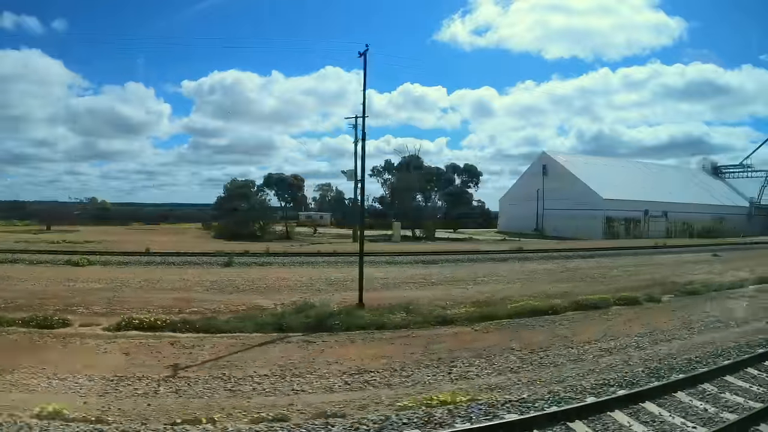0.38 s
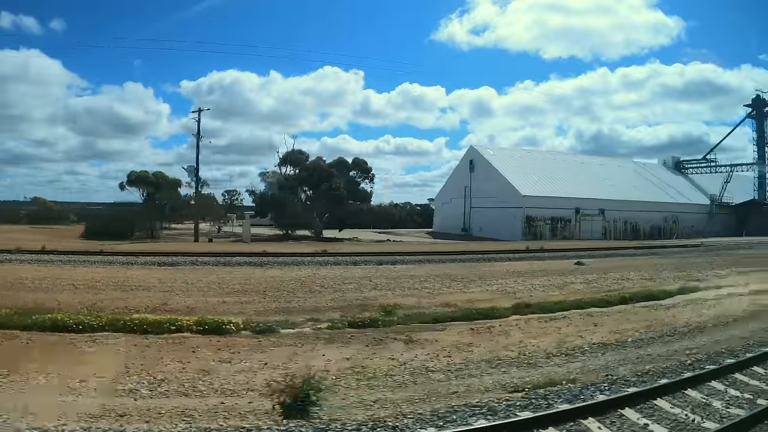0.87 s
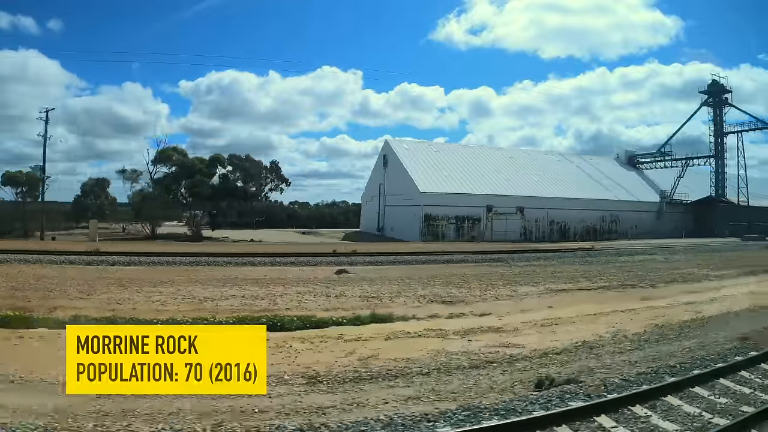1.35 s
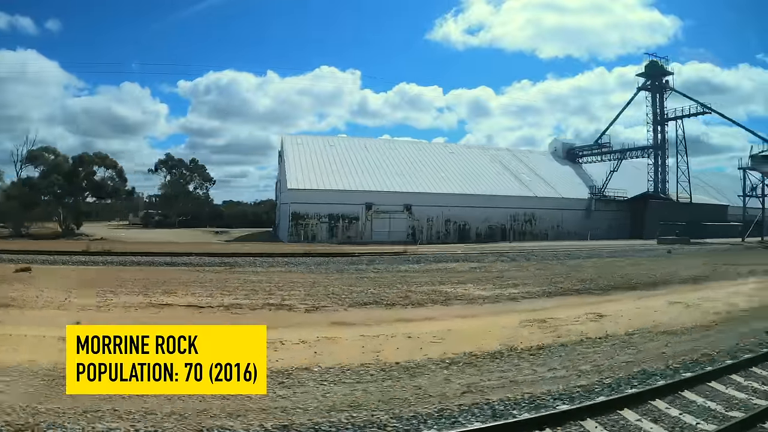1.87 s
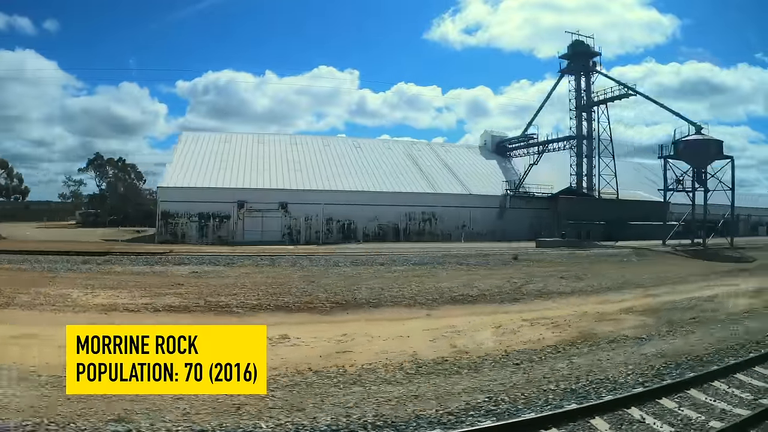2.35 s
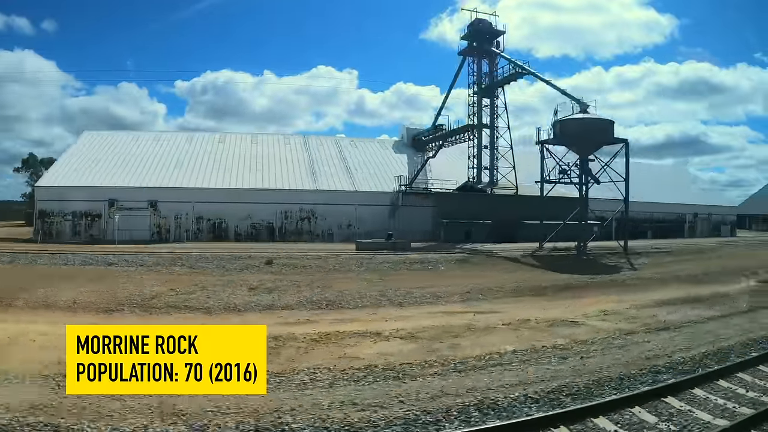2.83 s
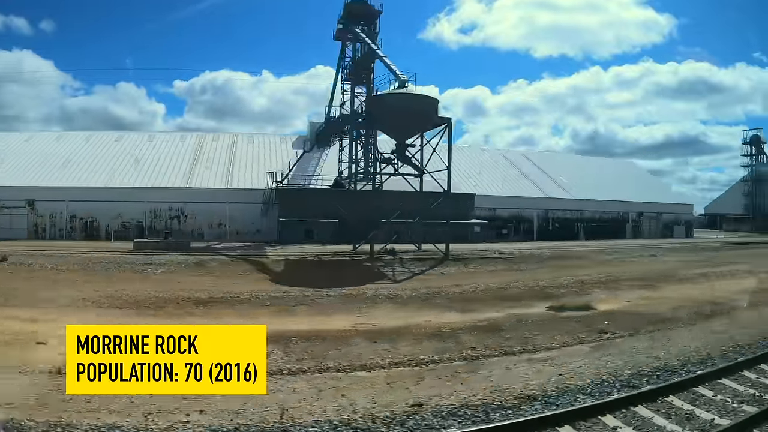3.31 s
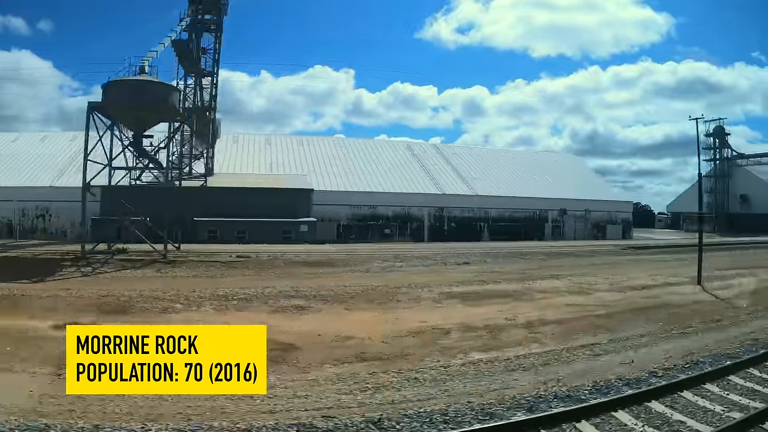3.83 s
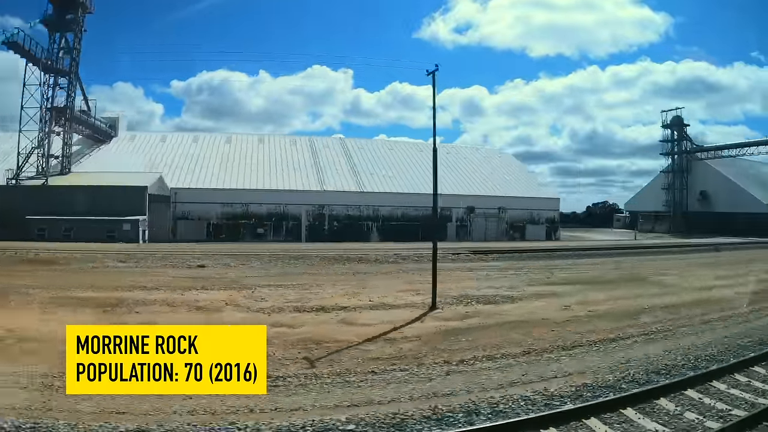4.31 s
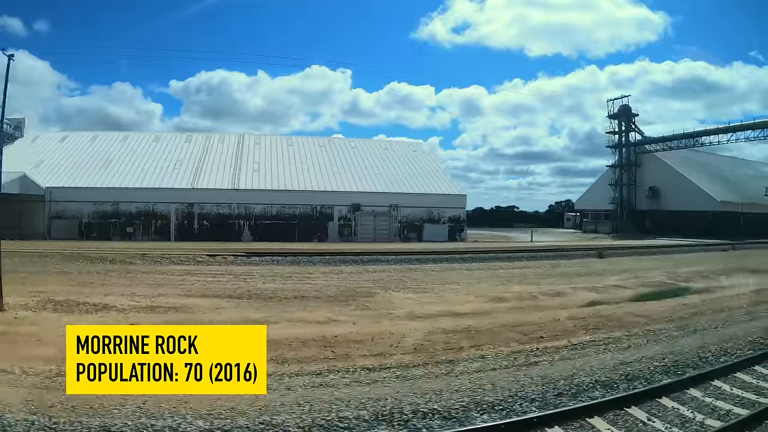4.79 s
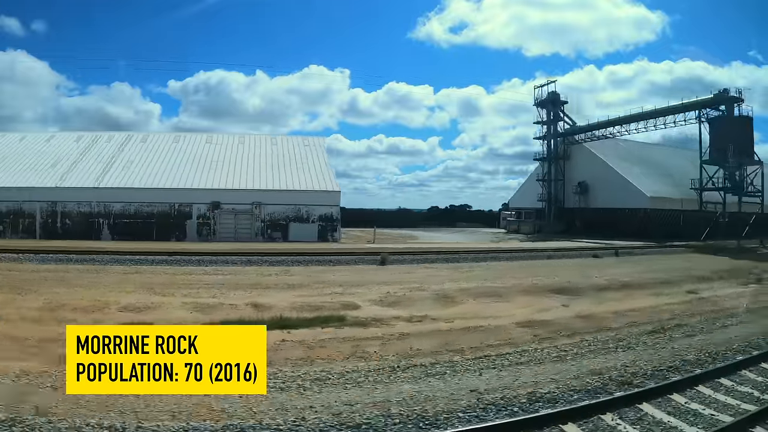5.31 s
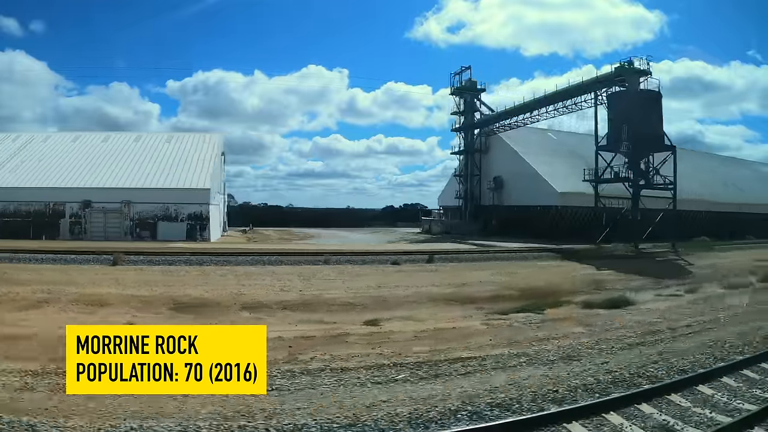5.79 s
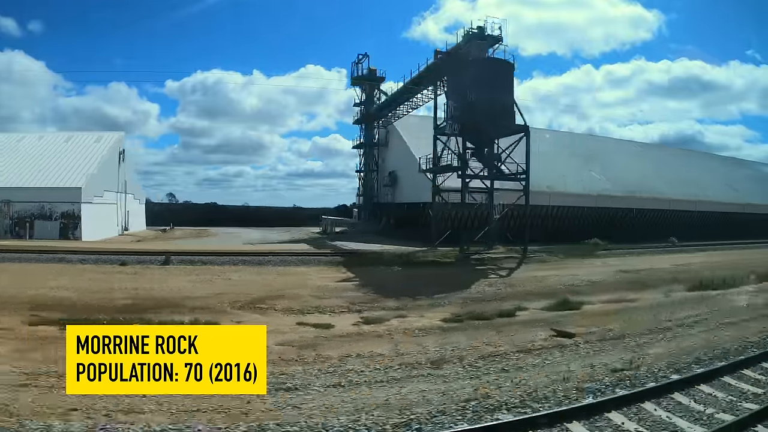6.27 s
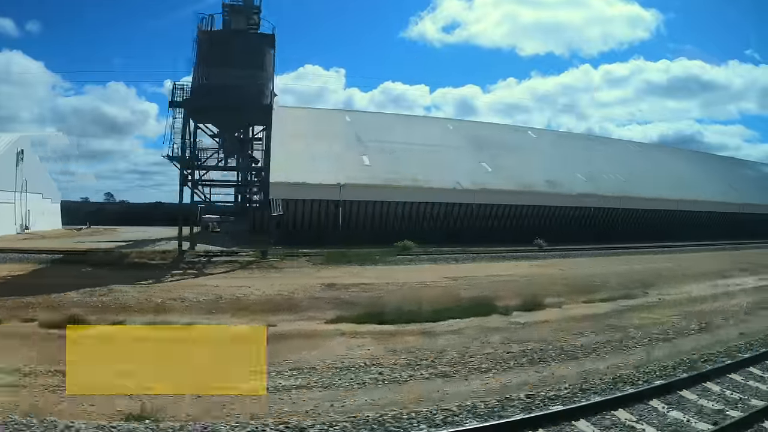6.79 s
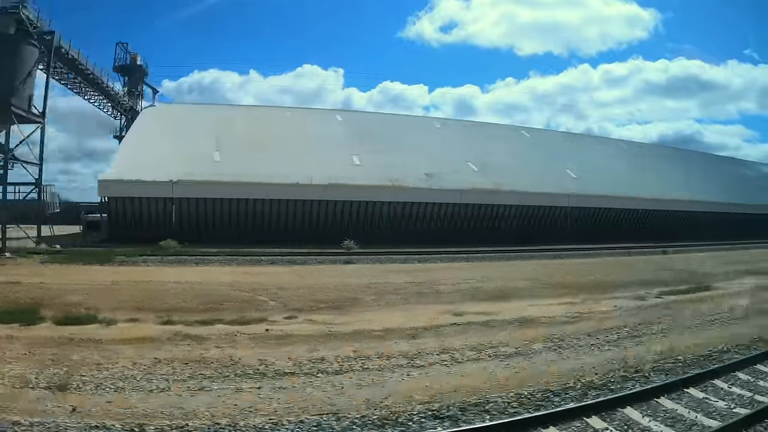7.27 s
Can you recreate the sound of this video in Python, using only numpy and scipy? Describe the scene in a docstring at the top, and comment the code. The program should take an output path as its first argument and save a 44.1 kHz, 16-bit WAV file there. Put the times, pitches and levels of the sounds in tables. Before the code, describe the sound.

Interior of a diesel passenger carriage running at speed past open land and large sheds, which make no sound of their own. From 0 to about 7.4 s a dense, dark roar of wheels on rail holds nearly steady, strongest below 400 Hz, with little treble. Soft floor booms near 76 Hz swell irregularly, strongest around 1.5, 4.3 and 6.4 s. Wheel tones form a wavering hum that climbs very slightly, a bit faster after 5.4 s; thin machinery whines around 650 to 860 Hz beat slowly. A light knock at 0.29 s and a sharper clustered one at 0.52 s ring briefly on a hard panel. A tiny squeak glides up at 0.9 s. Wall drones near 220 Hz surge around 2.2 and 2.8 s, others later. Faint treble rustles flicker throughout. A soft click comes at 3.6 s, a small rattle at 5.04 s, and faint clicks close it at 7.3 s.

```python
"""A low rolling roar with a comb of slowly climbing tones, inside a diesel passenger carriage at speed.
Wheel noise and floor booms are filtered noise and a wandering sine; the comb is multiples of the wheel's turning
rate, which rises as the train gains speed. Machinery whines are wavering sines, some beating slowly. Treble noise
rustles in flurries; short noise bursts click and rattle, a panel rings in decaying modes when knocked,
the walls drone in surges and one small squeak glides upward."""
import sys
import numpy as np
from scipy import signal
from scipy.fft import rfft, irfft
from scipy.io import wavfile
from scipy.ndimage import uniform_filter1d

SR = 44100
rng = np.random.default_rng(int(sys.argv[2]) if len(sys.argv) > 2 else 0)


def waveform_to_disk(signal):
    """Save audio, clipped to [-1, 1], as 16-bit WAV at the path in sys.argv[1]."""
    frames = np.transpose(np.atleast_2d(signal))
    scaled = np.clip(frames, -1, 1) * 32767
    samples = np.round(scaled).astype(np.int16)
    wavfile.write(sys.argv[1], SR, samples)


def voltage_ratio(decibels):
    """Convert decibels (scalar or array-like) to amplitude ratios, 20 dB per decade."""
    exponent = np.asarray(decibels, float) / 20
    return 10 ** exponent


N = 325634


def evened(x):
    """Scales to rms 1."""
    return x / np.sqrt(np.mean(x ** 2) + 1e-20)


def along(rows):
    """Columns of a table over time, one value a sample."""
    s, *columns = np.transpose(rows)
    return [np.interp(np.arange(N) / SR, s, c) for c in columns]


def drift(rate, count):
    """Slow chance: straight paths between normal random values, rate of them a second."""
    knots = rng.standard_normal((count, 300))
    at = np.arange(N) / SR * rate
    return [np.interp(at, np.arange(knots.shape[1]), row) for row in knots]


def shape(points, size):
    """Bin frequencies and a spectrum read on a log-frequency axis."""
    hz = np.fft.rfftfreq(size, 1 / SR)
    f, db = np.transpose(points)
    return hz, np.interp(np.log(hz + 1), np.log(f + 1), db)


def noise(shape_db, size, patchy_db, patch_s, patch_hz):
    """Random short-time spectra under a shape, with louder and quieter patches; rms 1."""
    hop = size // 4
    a, b, patches = rng.standard_normal((N // hop + 5, size // 2 + 1, 3)).T
    patches = uniform_filter1d(patches, max(1, round(patch_hz * size / SR)), 0)
    patches = evened(uniform_filter1d(patches, max(1, round(patch_s * SR / hop)), 1))
    z = (a + 1j * b) * voltage_ratio(shape_db[:, None] + patchy_db * patches)
    return evened(signal.istft(z, nperseg=size, noverlap=size - hop)[1][:N])


def swell(s, top_db, rise, fall):
    """Power of a bump that climbs 10 dB in rise seconds and sinks 10 dB in fall seconds."""
    t = np.arange(N) / SR - s
    return voltage_ratio(2 * top_db + 20 * np.minimum(t / rise, -t / fall))


def burst(s, level_db, centre_hz, width, rise, t60, wide_db=-14):
    """A decaying burst of noise: a broad ring over a weaker wide-band snap."""
    out = np.zeros(N + SR)
    t = np.arange(SR // 2) / SR
    hz = np.fft.rfftfreq(len(t), 1 / SR)
    snap = voltage_ratio(wide_db) / (1 + (hz / 6000) ** 4) / (1 + (500 / (hz + 1)) ** 4)
    ring = 1 / (1 + (2 * (hz - centre_hz) / width) ** 4)
    hiss = evened(irfft(rfft(rng.standard_normal(len(t))) * (ring + snap), len(t)))
    envelope = (1 - np.exp(-t / rise)) * voltage_ratio(level_db - 60 * t / t60)
    out[round(s * SR):][:len(t)] = hiss * envelope
    return out[:N]


def shell_db(hz):
    """Gain of the body shell: its resonances lift the roar and the wheel tones."""
    # resonances: f/Hz, width/Hz, gain/dB
    resonances = [(120.4, 18, 5.5), (200, 5.4, 4.5), (223, 5.2, 2), (230.6, 10, 3.5), (353.2, 14, 6),
                  (426, 14, 2.5), (451, 24, 1.5), (613, 68, 2)]
    return sum(gain_db / (1 + (2 * (hz - f) / width) ** 2) for f, width, gain_db in resonances)


def roar():
    """Wheels on rail roughness, heard through floor and walls and coloured by the body shell."""
    # spectrum ahead of the shell resonances: f/Hz, relative density/dB per Hz
    roar_spectrum = [(20, -29.5), (33, -23), (48, -7.5), (80, -7), (105, -5.5), (220, -5.5), (290, -11),
                     (400, -13), (480, -15.5), (700, -24), (870, -25), (930, -29.5), (1100, -33.5),
                     (1500, -39.5), (2500, -48), (5000, -69), (12000, -110)]
    # swell of the whole roar: t/s, level/dB rms
    roar_level = [(0, -31.5), (1.3, -33.5), (3.8, -33), (4.3, -32.5), (5.3, -33.5), (6.3, -32.5),
                  (7.38, -33)]
    hz, db = shape(roar_spectrum, size=8192)
    rolling = noise(db + shell_db(hz), size=8192, patchy_db=1.5, patch_s=.25, patch_hz=30)
    return voltage_ratio(along(roar_level)[0]) * rolling


def boom(centre_hz=76.3, wander_hz=9.1, calm_db=-44.5):
    """The lowest resonance of the floor, booming at jolts from uneven track, on a wandering pitch."""
    # jolts: t/s at the top, level/dB rms at the top
    jolts = [(.07, -32), (.61, -33), (1.51, -28), (2.4, -32), (2.79, -42), (3.29, -31), (3.81, -33.5),
             (4.11, -33), (4.34, -30.5), (4.62, -37), (5.04, -35.5), (5.66, -35.5), (6.44, -30.5),
             (6.82, -44), (7.02, -36.5)]
    hz = centre_hz + wander_hz * drift(22., count=1)[0]
    power = voltage_ratio(2 * calm_db) + sum(swell(s, db, rise=.12, fall=.099) for s, db in jolts)
    return np.sqrt(2 * power) * np.sin(2 * np.pi * np.cumsum(hz) / SR)


def wheels(waver_db=2.2, waver_rad=1.1, rate=2.2):
    """Bumps come round every turn; several wheels share them, so tones waver, and swell at resonances."""
    # wheel speed as the train gains pace: t/s, turning rate/turns per second
    wheel_speed = [(0, 11.46), (1.48, 11.497), (2.95, 11.536), (4.43, 11.568), (5.4, 11.605), (5.9, 11.65),
                   (6.5, 11.745), (7.38, 11.79)]
    # unevenness round the wheel: multiple of the turning rate, level/dB rms ahead of waver and shell
    orders = [(2, -59.5), (3, -59.5), (4, -57), (5, -43.5), (6, -55), (7, -49.5), (8, -43), (10, -51),
              (11, -58.5), (12, -48), (13, -62.5), (14, -44.5), (15, -46.5), (16, -58.5), (17, -47),
              (18, -47.5), (19, -49), (20, -47), (22, -58), (23, -48.5), (24, -63), (25, -56), (26, -52),
              (27, -54), (28, -52.5), (29, -57), (30, -55), (31, -55), (32, -56.5), (33, -64.5),
              (34, -62.5), (35, -54), (36, -64.5), (37, -58), (38, -56.5), (42, -54.5), (43, -67),
              (44, -67.5), (45, -73.5), (47, -64), (48, -63), (50, -69.5), (52, -73.5), (53, -77),
              (54, -73), (55, -70.5), (57, -67), (58, -73)]
    speed = along(wheel_speed)[0]
    turns = 2 * np.pi * np.cumsum(speed) / SR
    level, slip = drift(rate, count=len(orders)), drift(rate, count=len(orders))
    start = 2 * np.pi * rng.random(len(orders))
    out = np.zeros(N)
    for (k, db), u, v, p in zip(orders, level, slip, start):
        # the shell gain is read every 100 samples
        gain_db = np.repeat(shell_db(k * speed[::100]), 100)[:N]
        loudness = np.sqrt(2) * voltage_ratio(db + waver_db * u + gain_db)
        out += loudness * np.cos(k * turns + waver_rad * v + p)
    return out


def whines(rate=3., waver_db=1.2, waver_rad=.25):
    """Tones of engine, gears and fans at fixed speed, each wavering a little."""
    # machinery: f/Hz, level/dB rms ahead of the waver
    machinery = [(45.1, -50), (652.7, -66), (743.6, -65), (819.4, -63.5), (832.4, -67), (841.8, -67),
                 (847.9, -67), (934.7, -74), (1200.3, -78), (1309.7, -71), (1402.3, -84)]
    t = np.arange(N) / SR
    level, slip = drift(rate, count=len(machinery)), drift(rate, count=len(machinery))
    start = 2 * np.pi * rng.random(len(machinery))
    out = np.zeros(N)
    for (hz, db), u, v, p in zip(machinery, level, slip, start):
        loudness = np.sqrt(2) * voltage_ratio(db + waver_db * u)
        out += loudness * np.cos(2 * np.pi * hz * t + waver_rad * v + p)
    return out


def twins(rate=4., waver_db=.7, waver_rad=.2):
    """Two engines a little out of step share each tone: loud when in step, sinking when opposed."""
    # shared tones: f/Hz, level/dB rms ahead of beating and waver, second engine's share/0-1, one dip/s
    shared_tones = [(738.6, -59.5, .45, 4.55), (756.4, -58.3, .45, 5.3), (773.3, -65, .7, 5.55),
                    (859.7, -55.5, .22, 4.95)]
    # how fast the engines slip past each other: t/s, rate/beats per second
    beat_rate = [(0, .44), (7.38, .57)]
    t = np.arange(N) / SR
    beats = 2 * np.pi * np.cumsum(along(beat_rate)[0]) / SR
    level, slip = drift(rate, count=len(shared_tones)), drift(rate, count=len(shared_tones))
    start = 2 * np.pi * rng.random(len(shared_tones))
    out = np.zeros(N)
    for (hz, db, share, dip), u, v, p in zip(shared_tones, level, slip, start):
        beating = abs(1 - share * np.exp(1j * (beats - beats[round(dip * SR)])))
        loudness = np.sqrt(2) * voltage_ratio(db + waver_db * u) * beating
        out += loudness * np.cos(2 * np.pi * hz * t + waver_rad * v + p)
    return out


def rustle(dull_db=-69, dull_share=0.47, corner_hz=3500, flicker_db=1.5, flickers_per_s=27):
    """Patchy treble noise that comes and goes; its lower part follows the unrest only in part."""
    # spectrum: f/Hz, relative density/dB per Hz
    rustle_spectrum = [(700, -26), (1500, -8), (2500, -7), (3700, -7.5), (5000, -11), (7000, -13.5),
                       (8600, -21), (9800, -18.5), (11200, -36.5), (14000, -74.5)]
    # floor under the flurries: t/s, level/dB rms
    calm_level = [(0, -70.5), (.25, -79.5), (.7, -74.5), (.85, -88.5), (2.1, -91), (2.4, -82.5), (3.6, -78),
                  (4.05, -81), (4.2, -85), (4.7, -83.5), (5.15, -81), (5.6, -89), (6.1, -82), (6.6, -86),
                  (7.0, -83), (7.38, -74)]
    # flurries: t/s at the top, level/dB rms at the top, rise/s per 10 dB, fall/s per 10 dB
    flurries = [(.075, -71.5, .02, 0.069), (0.921, -76, .12, 0.082), (1.1, -74.5, 0.014, 0.13),
                (1.3, -78, 0.067, .07), (1.52, -73.5, 0.046, 0.067), (1.7, -74, 0.055, .07),
                (1.76, -75.5, .012, 0.069), (1.989, -77.5, .008, 0.082), (2.429, -76, 0.25, 0.22),
                (2.72, -75, .05, .15), (3.07, -72.5, .15, 0.086), (3.301, -75, 0.046, 0.062),
                (3.46, -75.5, .08, .03), (3.805, -75, .012, .06), (3.88, -74.5, .02, 0.048),
                (4.04, -77, 0.033, .07), (4.54, -81, 0.046, .12), (4.656, -77.5, 0.035, 0.17),
                (4.85, -73.5, .06, .05), (5.72, -71.5, .08, .17), (6.181, -73.5, 0.037, 0.044),
                (6.3, -77, .03, 0.045), (7.11, -77, .01, 0.044)]
    power = voltage_ratio(2 * along(calm_level)[0]) + sum(swell(*row) for row in flurries)
    unrest_db = 10 * np.log10(power) + flicker_db * drift(flickers_per_s, count=1)[0]
    hz, db = shape(rustle_spectrum, size=512)
    # share of the power that goes to the bright part
    high = 1 / (1 + (corner_hz / (hz + 1)) ** 4)
    bright_shape = db + 10 * np.log10(high)
    dull_shape = db + 10 * np.log10(1 - high + 1e-9)
    bright = noise(bright_shape, size=512, patchy_db=2.2, patch_s=.025, patch_hz=2000)
    dull = noise(dull_shape, size=512, patchy_db=2.0, patch_s=.04, patch_hz=800)
    dull_level = dull_db + dull_share * (unrest_db - unrest_db.mean())
    return voltage_ratio(unrest_db) * bright + voltage_ratio(dull_level) * dull


def clicks():
    """Short noise bursts: clicks of fittings, the bright snap of the knocks, and one at the very end."""
    # bursts: t/s, level/dB ahead of rise and decay, centre f/Hz, width/Hz, rise time constant/s
    bursts = [(0.285, -53.5, 2500, 8000, .002), (.368, -61, 5330, 7000, .0012),
              (.464, -60, 2980, 3000, .003), (0.518, -47.5, 2810, 4500, .001),
              (0.5185, -66, 9000, 5000, .0006), (0.538, -57.5, 2950, 3000, 0.0022),
              (1.9964, -67, 3800, 2000, 0.0017), (3.2914, -66, 3540, 3000, .0023),
              (3.6, -51, 3000, 5000, 0.011), (6.285, -62, 3500, 2030, .0043),
              (7.33, -56.5, 3600, 3000, 0.0051), (7.365, -59.5, 4060, 3900, .003)]
    return sum(burst(*row, t60=.16) for row in bursts)


def knocks(rise_s=.0004):
    """Each knock on a hard panel starts all its modes, which ring as decaying sines."""
    # blows: t/s, strength/dB
    blows = [(.285, -58), (.289, -56), (.5173, -43), (.5212, -47), (.5275, -49), (.5385, -55)]
    # modes of the panel: f/Hz, level/dB on top of the blow, t60/s
    modes = [(420, 7, .04), (640, 9, .035), (790, 13, .045), (1130, 7, .04), (1370, -1, .04),
             (1600, 4, .04), (2010, 0, .035), (2340, 3, .045), (2760, 5, .04), (3090, 1, .04),
             (3600, 5, .03), (3950, 0, .035), (4500, -3, .03)]
    out = np.zeros(N)
    t = np.arange(SR // 5) / SR
    contact = 1 - np.exp(-(t / rise_s) ** 2)
    chances = rng.standard_normal((len(blows), len(modes)))
    for (s, blow_db), chance in zip(blows, chances):
        for (hz, db, t60), u in zip(modes, chance):
            # chance shifts each mode a little in level and pitch at each blow
            decay = voltage_ratio(blow_db + db + 1.5 * u - 60 * t / t60)
            ring = decay * np.sin(2 * np.pi * hz * (1 + .012 * u) * t)
            out[round(s * SR):][:len(t)] += contact * ring
    return out


def surges(wander_hz=7.93):
    """The drone of the walls swells now and then, as sines on an unsteady pitch."""
    # surges: t/s at the top, level/dB rms at the top, f/Hz
    drones = [(.4, -41, 215), (.62, -34.5, 110), (1.75, -38, 225), (2.22, -34.5, 224), (2.78, -35.5, 222),
              (3.4, -38.5, 222), (4.1, -36, 135), (4.17, -36.5, 232), (5.75, -38.5, 205), (6.3, -39, 225),
              (6.95, -35.5, 200)]
    t = np.arange(N) / SR
    wander = 2 * np.pi * np.cumsum(wander_hz * drift(20., count=1)[0]) / SR
    out = np.zeros(N)
    for s, db, hz in drones:
        loudness = np.sqrt(2 * swell(s, db, rise=.1, fall=.12))
        out += loudness * np.sin(2 * np.pi * hz * t + wander)
    return out


def squeak(rough_db=1.6, wobble_hz=9):
    """A short rub: a thin, rough tone that glides up while it swells, then lets go."""
    start_s, length_s, release_s = .868, .11, .012  # release: seconds per 10 dB, also before the start
    low_hz, high_hz = 1540, 2035
    start_db, top_db = -72, -66.5
    t = np.arange(N) / SR - start_s
    climb = np.sin(np.pi / 2 * np.clip(t / length_s, 0, 1))
    hz = low_hz + (high_hz - low_hz) * climb ** 2
    db = start_db + (top_db - start_db) * climb
    outside_s = np.maximum(np.maximum(t - length_s, -t), 0)
    db = db - 10 * outside_s / release_s
    grip = evened(uniform_filter1d(rng.standard_normal(N), size=400))
    hz = hz + wobble_hz * evened(uniform_filter1d(rng.standard_normal(N), size=200))
    return np.sqrt(2) * voltage_ratio(db + rough_db * grip) * np.sin(2 * np.pi * np.cumsum(hz) / SR)


def rattle():
    """One loose fitting shakes softly a few times, ringing in several noise bands at once."""
    # shakes: t/s, strength/dB
    shakes = [(5.024, -65), (5.038, -49.5), (5.049, -54), (5.062, -58), (5.076, -64)]
    # bands it rings in: level/dB on top of the shake, centre f/Hz, width/Hz, t60/s
    bands = [(-13, 2000, 1300, .19), (0, 3500, 900, .135), (-2, 4400, 1400, .125), (-8, 6400, 2000, .11)]
    out = np.zeros(N)
    for s, shake_db in shakes:
        for db, hz, width, t60 in bands:
            out += burst(s, shake_db + db, hz, width, rise=.0035, t60=t60)
    return out


def scene():
    """All sources at one microphone."""
    steady = roar() + boom() + wheels() + whines() + twins()
    passing = rustle() + clicks() + knocks() + surges() + squeak() + rattle()
    return (steady + passing)[None]


def low_pass(x):
    """Removes everything above the highest recorded frequency."""
    return signal.sosfilt(signal.butter(12, 11370, fs=SR, output="sos"), x)


def record(dry):
    """A soft start of 4 ms on the finished mix."""
    soft = np.minimum(np.arange(N) / (.004 * SR), 1)
    return low_pass(dry * soft)


dry = scene()
out = record(dry)
waveform_to_disk(out)
```